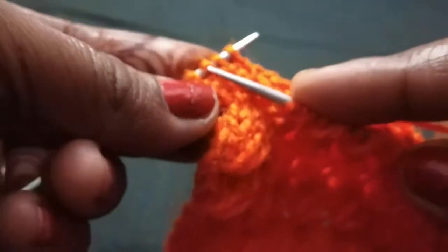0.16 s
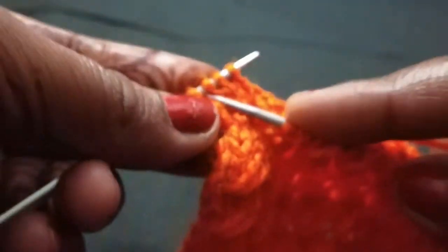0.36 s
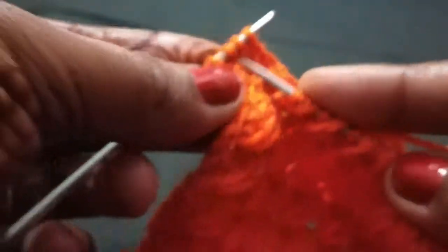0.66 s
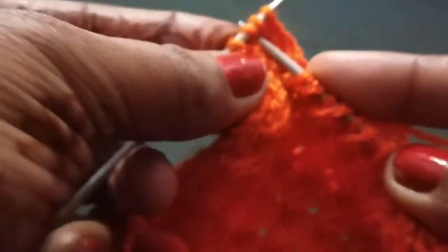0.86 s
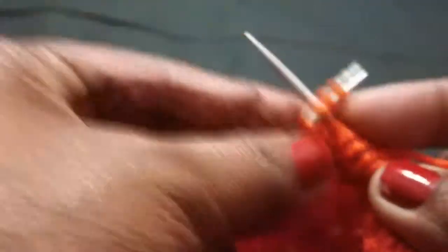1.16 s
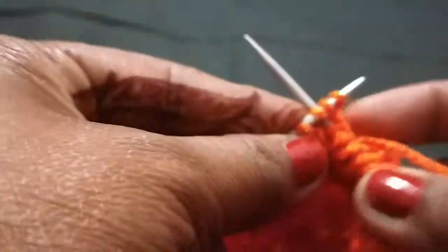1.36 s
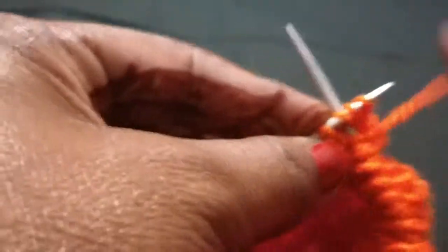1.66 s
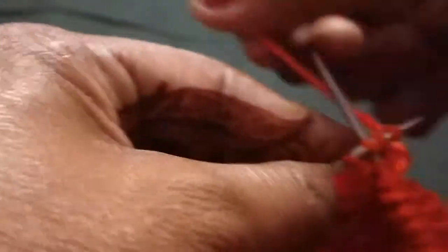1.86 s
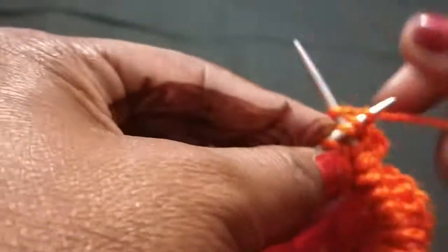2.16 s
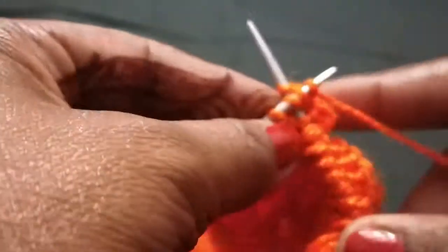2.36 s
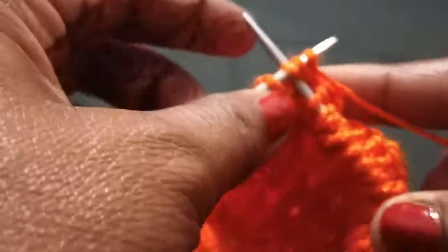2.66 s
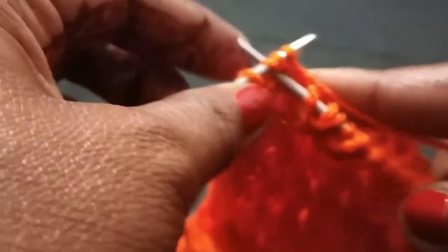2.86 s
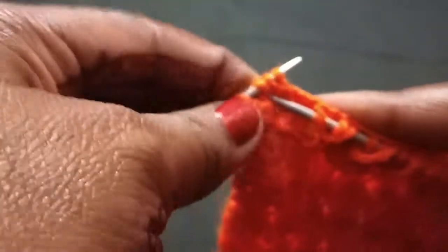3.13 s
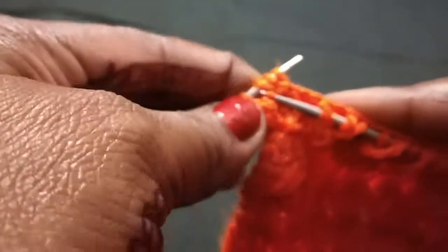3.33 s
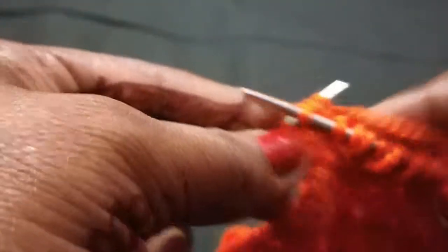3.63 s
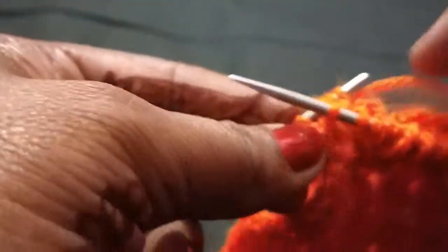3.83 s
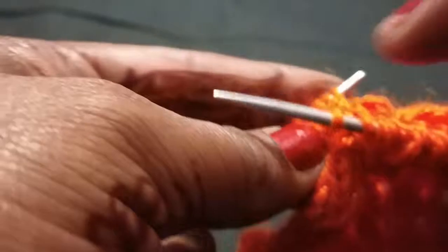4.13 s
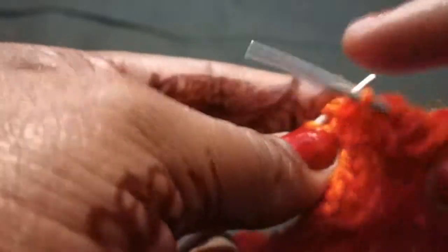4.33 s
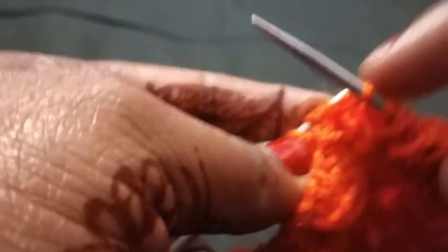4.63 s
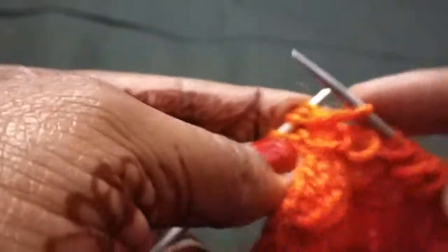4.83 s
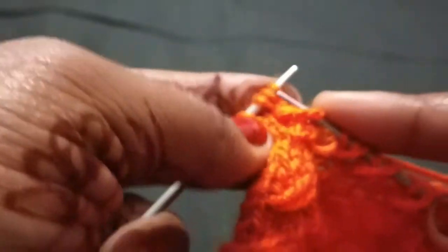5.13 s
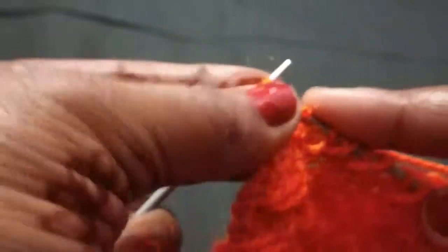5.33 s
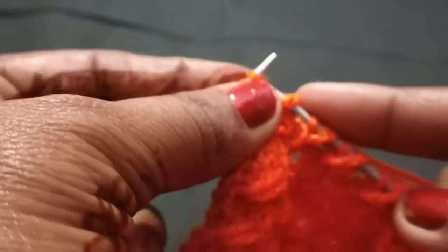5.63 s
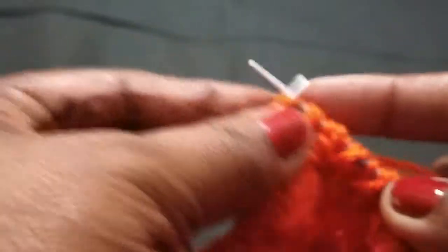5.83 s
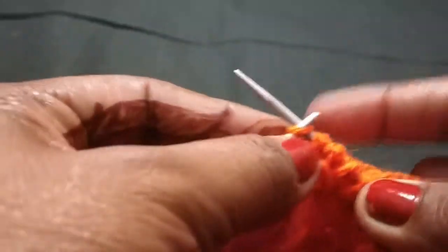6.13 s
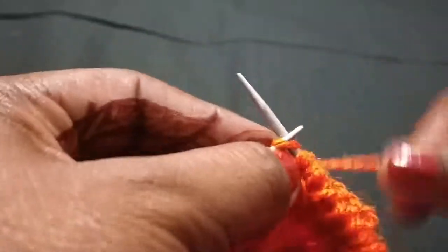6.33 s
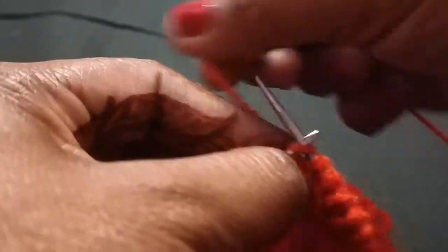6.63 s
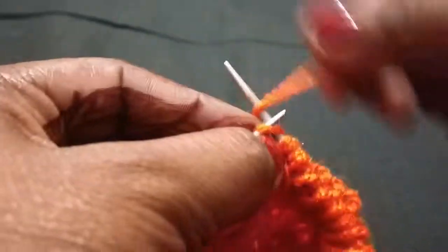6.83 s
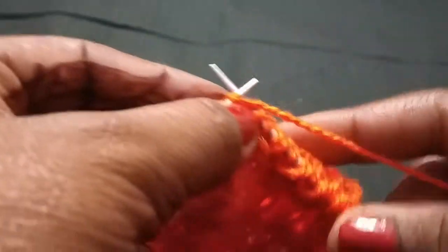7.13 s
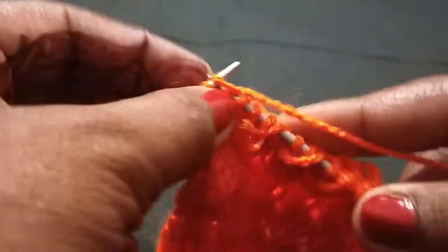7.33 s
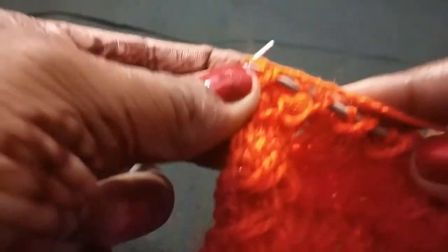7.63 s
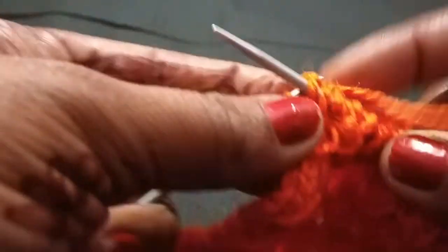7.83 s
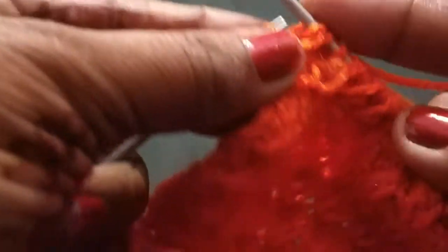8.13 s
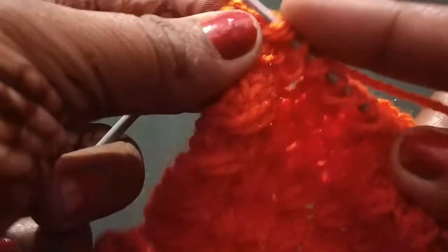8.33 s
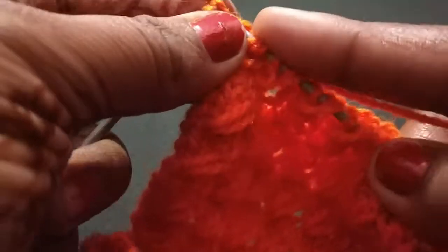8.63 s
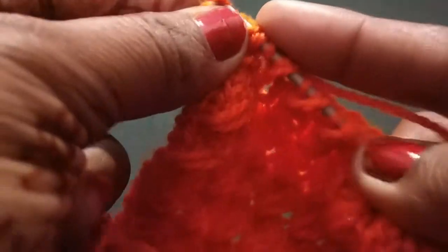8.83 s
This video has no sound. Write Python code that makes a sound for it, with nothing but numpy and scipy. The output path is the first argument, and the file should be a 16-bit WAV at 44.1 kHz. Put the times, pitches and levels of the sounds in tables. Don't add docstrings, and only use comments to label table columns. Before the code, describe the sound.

A small stereo microphone sits beside hands working wool on metal needles in a quiet room. Fibres scrape and swish, stitches slip off with small crisp snaps, and a needle end raps the plastic-like case in quick double or triple taps, mainly at right. Soft low bumps follow hand movements. Activity is hardest early, sparse midway, bumpy again after six seconds, then light and rustly, with thin hiss throughout.

```python
import sys
import numpy as np
from scipy import signal
from scipy.fft import rfft, irfft, next_fast_len
from scipy.io import wavfile
from scipy.ndimage import uniform_filter1d

SR = 44100
rng = np.random.default_rng(int(sys.argv[2]) if len(sys.argv) > 2 else 0)


def wav_record(signal):
    frames = np.transpose(np.atleast_2d(signal))
    bounded = np.clip(frames, -1, 1)
    quanta = np.round(bounded * 32767).astype(np.int16)
    wavfile.write(sys.argv[1], SR, quanta)


def magnitude_from_level(level_db):
    exponent = np.asarray(level_db, float) / 20
    return 10 ** exponent


N = 396018


def unit_rms(x):
    return x / np.sqrt(np.mean(x ** 2) + 1e-20)


def read_curve(points, hz):
    point_hz, value = np.transpose(points)
    return np.interp(np.log(hz + 1), np.log(point_hz + 1), value)


def resonances_db(modes, hz):
    power = sum(magnitude_from_level(2 * db) / (1 + ((hz - centre_hz) / width_hz) ** 4) for centre_hz, width_hz, db in modes)
    return 10 * np.log10(power)


def coloured(x, db_of_hz):
    size = next_fast_len(N)
    gain = magnitude_from_level(db_of_hz(np.fft.rfftfreq(size, 1 / SR)))
    return unit_rms(irfft(rfft(x, size) * gain, size)[:, :N])


def sides(left_right_db):
    return magnitude_from_level(np.array([left_right_db / 2, -left_right_db / 2]))


def ring(modes, t):
    return sum(magnitude_from_level(db - 60 * t / t60_s) * np.cos(2 * np.pi * hz * t) for hz, db, t60_s in modes)


def place(events, source, **settings):
    track = np.zeros((2, N))
    for start_s, *arguments in events:
        sound = source(*arguments, **settings)
        part = track[:, round(start_s * SR):][:, :sound.shape[1]]
        part += sound[:, :part.shape[1]]
    return track


def hiss():
    # hz, level_db
    spectrum = [(30, -60), (69, -30), (199, -1), (337, -3.5), (491, -9), (1340, -12.5), (4030, -16),
                (16000, -16.5)]
    # hz, left_right_likeness (0..1)
    likeness = [(60, 0.2), (290, 0.27), (640, 0.09), (1400, .01), (15000, 0.0083)]
    size = next_fast_len(N)
    hz = np.fft.rfftfreq(size, 1 / SR)
    a, b = rfft(rng.standard_normal((2, N + 1)), size)
    same = np.clip(read_curve(likeness, hz), 0, 1)
    pair = np.array([a, same * a + np.sqrt(1 - same ** 2) * b])
    noise = irfft(pair * magnitude_from_level(read_curve(spectrum, hz)), size)[:, :N]
    return magnitude_from_level(-57) * sides(-1.4)[:, None] * unit_rms(noise)


def strokes(table):
    swell_ratio = 1.13
    t = np.arange(0, N + 64, 64) / SR
    middle_s, half_s, db, extra_db = np.transpose(table)[:, :, None]
    u = (t - middle_s) / half_s * np.where(t < middle_s, 1 / swell_ratio, swell_ratio)
    return t, magnitude_from_level(2 * db) * np.exp(-2 * u ** 2), extra_db


def effort():
    # middle_s, half_length_s, rustle_db, left_right_db
    pulls = [(1.136, 0.061, -43.5, -2.5), (1.452, 0.087, -53, 0), (1.676, .049, -53, 4),
             (2.063, .045, -53, 0.5), (2.157, 0.04, -57.5, 3), (2.344, 0.02, -48.5, 5),
             (2.923, .043, -45, 0.5), (3.326, 0.033, -54.5, -1), (3.553, 0.053, -48.5, -1),
             (3.666, 0.087, -48, -2.5), (3.892, 0.086, -55, -1), (4.05, 0.046, -59, 5),
             (4.519, .035, -54, -5), (4.744, 0.086, -55.5, 2), (4.911, 0.06, -50.5, -5),
             (5.852, 0.063, -47, -2.5), (6.104, 0.11, -55.5, -2), (6.233, 0.049, -52, -2),
             (6.895, .025, -55, 1), (7.107, 0.041, -52, 0.5), (7.352, .034, -51.5, -1),
             (7.61, 0.091, -58.5, -5), (7.772, .074, -48.5, -3), (8.287, 0.045, -51, -6),
             (8.97, 0.062, -43.5, -1.5)]
    # middle_s, half_length_s, rustle_db, left_right_db
    slides = [(0.707, 0.36, -56, 4), (1.58, 0.28, -56.5, 2), (2.407, .229, -55.5, 0),
              (2.794, .11, -57.5, 0), (4.394, 0.11, -56, 3), (5.1, 0.12, -61.5, -1), (5.609, 0.18, -59, 2),
              (6.382, .107, -51, 2.5), (6.69, 0.092, -65.5, 17), (7.2, 0.29, -60, 0),
              (8.162, 0.47, -57, -0.5), (8.797, 0.12, -56, 3.5)]
    # middle_s, half_length_s, low_db, rub_above_low_db
    grips = [(.62, 0.26, -62.5, 5.5), (1.06, 0.073, -60.5, 2), (1.207, 0.013, -48, -7),
             (1.25, 0.052, -59, -15), (1.49, 0.087, -54, -0.5), (1.67, 0.097, -50, -1.5),
             (1.8, 0.16, -54.5, -4), (2.04, 0.078, -53, 0), (2.23, 0.07, -53.5, -15),
             (2.35, 0.11, -53.5, 1.5), (2.54, 0.058, -48, -9), (2.73, 0.1, -51, -3.5),
             (3.88, 0.051, -59.5, -3), (4.52, 0.063, -56.5, -0.5), (4.72, 0.12, -54.5, -11),
             (4.9, 0.044, -54.5, -4.5), (5.08, .13, -61.5, -4), (5.45, 0.065, -58.5, -15),
             (5.8, 0.11, -57.5, -8), (6.125, 0.053, -45.5, -8), (6.235, .05, -48.5, -4),
             (6.33, 0.11, -53, -2.5), (6.6, 0.083, -51.5, -3), (6.76, .1, -53.5, -4),
             (7.1, 0.042, -51, -4.5), (7.64, 0.071, -57.5, -4), (8.12, 0.13, -70, 7.5),
             (8.78, 0.051, -60.5, -1), (8.95, 0.061, -53, -3.5)]
    idle_rustle_db, idle_rub_db, idle_low_db = -67, -74.5, -69
    rub_below_rustle_db = -11

    t, pull, pan_db = strokes(pulls + slides)
    _, grip, rub_db = strokes(grips)
    rustle = pull.sum(0) + magnitude_from_level(2 * idle_rustle_db)
    rub = magnitude_from_level(2 * rub_below_rustle_db) * pull.sum(0)
    rub = rub + (grip * magnitude_from_level(2 * rub_db)).sum(0) + magnitude_from_level(2 * idle_rub_db)
    low = grip.sum(0) + magnitude_from_level(2 * idle_low_db)
    side_db = (pull * pan_db).sum(0) / rustle
    curves = np.sqrt(rustle), np.sqrt(rub), np.sqrt(low), side_db
    return [np.interp(np.arange(N) / SR, t, curve) for curve in curves]


def fibres(per_s, spread_db, share, lag_samples):
    snaps = rng.standard_normal((3, N)) * (rng.random(N) < per_s / SR)
    snaps *= magnitude_from_level(spread_db * np.minimum(rng.exponential(1, N), 4))
    common = np.array([np.roll(snaps[2], lag_samples), snaps[2]])
    return np.sqrt(share) * common + np.sqrt(1 - share) * snaps[:2]


def patchy(x, patchy_db, bins, frames):
    z = signal.stft(x, nperseg=256)[2]
    field = uniform_filter1d(rng.standard_normal(z.shape[1:]), bins, axis=0)
    field = unit_rms(uniform_filter1d(field, frames, axis=1))
    return unit_rms(signal.istft(z * magnitude_from_level(patchy_db * field), nperseg=256)[1][:, :N])


def wool():
    # hz, level_db
    rustle_spectrum = [(1500, -28), (3000, -10.5), (5000, -9.5), (9000, -2), (11500, -2.5), (14000, -2),
                       (16000, -5.5)]
    # hz, level_db
    rub_spectrum = [(300, -2), (600, 2), (1200, -1.5), (2500, -2.5), (5000, -8.5), (9000, -14)]
    # centre_hz, width_hz, level_db
    stand = [(231, 40, -0.5), (294, 80, -6)]
    rustle_gain, rub_gain, low_gain, side_db = effort()
    rustle = coloured(fibres(12000, 0.83, 0.033, 12), lambda hz: read_curve(rustle_spectrum, hz))
    rustle = patchy(rustle, 1.26, bins=24, frames=4)
    rub = coloured(fibres(3000, 1.5, 0.17, 8), lambda hz: read_curve(rub_spectrum, hz))
    rub = patchy(rub, 3.2, bins=4, frames=8)
    low = coloured(fibres(400, 1.84, 0.94, 3), lambda hz: resonances_db(stand, hz))
    return sides(side_db) * (rustle_gain * rustle + rub_gain * rub) + low_gain * low


def squeak():
    # time_s, level_db
    swell = [
        (.25, -95),
        (.33, -86),
        (.55, -72.5),
        (.66, -91),
    ]
    # centre_hz, width_hz
    partials = [(750, 55), (1550, 83)]
    time_s, db = np.transpose(swell)
    level_db = np.interp(np.arange(N) / SR, time_s, db, -120, -120)
    modes = [(hz, width_hz, 0) for hz, width_hz in partials]
    return magnitude_from_level(level_db) * coloured(rng.standard_normal((2, N)), lambda hz: resonances_db(modes, hz))


def push(t, start_ms, contact_ms):
    u = np.maximum(t * 1000 - start_ms, 0) / (0.21 * contact_ms)
    force = u ** 2 * np.exp(-u)
    return force / np.sum(force)


def knock(db, contact_ms, rebound, ring_hz):
    # multiple_of_ring_hz, level_db, t60_s
    case_right = [(1, 0.5, 0.0059), (2.6, -20, 0.0024), (5, -8, 0.0013), (7.5, -16, 0.0013)]
    # hz, level_db, t60_s
    case_left = [(450, -24, 0.017), (255, -41.5, 0.037), (900, -52, .006)]
    # hz, level_db, t60_s
    case_sway = [(230, -13.5, 0.036), (360, -22, 0.014)]
    travel_s, rebound_ms = 0.0012, 2.246
    t = np.arange(2500) / SR

    def near(hz):
        return ring([(multiple * hz, *rest) for multiple, *rest in case_right], t)

    sway = -ring(case_sway, t) * np.minimum(t / 0.000057, 1)
    far = -ring(case_left, t) * np.minimum(t / 0.00024, 1)
    far = np.pad(far, (round(travel_s * SR), 0))[:len(t)]
    blow = push(t[:400], 0, contact_ms)[None]
    bounce = push(t[:400], rebound_ms, 1.86 * contact_ms)[None]
    first = signal.fftconvolve([far, near(ring_hz) + sway], blow, axes=1)
    second = signal.fftconvolve([far, near(0.79 * ring_hz)], bounce, axes=1)
    return magnitude_from_level(db + 9.5) * (first + rebound * second)


def knocks():
    # start_s, peak_db, contact_ms, rebound_share, ring_hz
    hits = [(1.18, -12.5, 0.11, 0.35, 960), (1.1894, -17.5, 0.33, .2, 820), (1.195, -23, 0.73, 0.44, 660),
            (1.2598, -21.5, 0.23, 0.35, 830), (1.2708, -28.5, 0.43, 0.74, 490),
            (1.2774, -33, 0.69, 0.94, 750), (1.4749, -13, 0.14, 0.52, 905),
            (1.4837, -17.5, 0.28, 0.17, 806), (2.1977, -19.5, 0.25, 0.43, 760),
            (2.2052, -26.5, 0.68, .42, 810), (2.5154, -16.5, 0.19, 0.43, 900),
            (2.5221, -22.5, .48, 0.52, 725), (6.0947, -29.5, 0.27, 0.31, 730),
            (6.3444, -23.5, 0.23, 0.81, 520), (6.3526, -29, 0.41, 0.4, 470), (6.6093, -26, 0.21, 0.87, 510),
            (6.6172, -33, 0.54, .5, 450), (6.9873, -21, 0.27, 0.88, 750), (6.9953, -28, 0.45, 0.71, 610)]
    return place(hits, knock)


def burst(db, length_ms, centre_hz, left_right_db, width_hz):
    size = 2048
    noise = rng.standard_normal((2, size)) * magnitude_from_level(0.65 * rng.exponential(1, size))
    hz = np.fft.rfftfreq(size, 1 / SR)
    band = 1 / np.sqrt(1 + ((hz - centre_hz) / (0.5 * width_hz)) ** 2)
    noise = unit_rms(irfft(rfft(noise) * band))
    u = np.arange(size) / SR * 1000 / length_ms
    envelope = np.minimum(u / 0.043, 1) / (1 + u ** 6)
    return magnitude_from_level(db - 6) * sides(left_right_db)[:, None] * noise * envelope


def slips():
    # start_s, peak_db, length_ms, centre_hz, left_right_db
    stitches = [(1.4283, -38, 7.5, 10500, 0), (1.599, -48, 9, 9520, 1), (2.4005, -44.5, 13, 3460, 6),
                (2.7426, -41, 16, 2030, 9), (2.7483, -37, 7.3, 3840, 4.5), (3.3214, -51.5, 6.2, 8530, -1),
                (3.8753, -45.5, 14, 11600, -11), (4.5194, -49, 6.6, 12000, 4), (4.865, -48, 5.3, 9010, -8),
                (6.094, -40.5, 5.7, 9670, -2), (6.8894, -51, 8.3, 11000, -1), (7.092, -44.5, 9.7, 5700, -1),
                (7.3497, -47, 8.1, 10200, -3), (7.6011, -45.5, 17, 10200, -1.5)]
    return place(stitches, burst, width_hz=8000)


def thump(db, hz, t60_s, left_right_db):
    snap_db_per_s = -130
    t = np.arange(4000) / SR
    modes = [(hz, 0, t60_s), (2.74 * hz, snap_db_per_s * t60_s, 0.35 * t60_s)]
    body = ring(modes, t) * np.minimum(t / 0.00083, 1)
    return magnitude_from_level(db) * sides(left_right_db)[:, None] * body


def thumps():
    # start_s, peak_db, hz, t60_s, left_right_db
    jolts = [(1.429, -31, 255, 0.07, 2.5), (1.663, -39, 330, .067, 4), (2.006, -42.5, 350, 0.065, 6),
             (2.39, -35.5, 223, .078, 1), (2.488, -26.5, 324, 0.033, 6), (2.678, -46, 266, 0.1, 9),
             (2.754, -31, 382, 0.031, 3), (3.876, -45, 290, .05, -2), (4.508, -41, 212, 0.039, -5),
             (4.668, -39.5, 224, 0.036, -6), (4.867, -37, 224, 0.046, -3), (6.078, -44, 242, .05, 0),
             (6.084, -35, 260, .05, -10), (6.094, -24, 235, 0.12, 2.5), (6.187, -37, 234, 0.064, -5),
             (6.208, -38, 231, .05, -6), (6.218, -34, 222, 0.14, -3), (6.231, -29, 346, 0.028, 6),
             (6.236, -33, 230, 0.029, -3), (6.618, -33, 256, 0.066, -2), (7.1, -37.5, 219, 0.14, 2),
             (7.613, -39.5, 221, .072, -3), (7.748, -47, 192, 0.094, -3), (8.277, -45.5, 214, 0.13, -3)]
    return place(jolts, thump)


def ticks():
    # start_s, peak_db, length_ms, centre_hz, left_right_db
    touches = [
        (2.4862, -27, 2.6, 6000, 3),
        (7.5657, -37, 2.6, 6500, -2),
    ]
    return place(touches, burst, width_hz=14000)


def drags():
    # start_s, peak_db, length_ms, centre_hz, left_right_db
    scrapes = [
        (2.535, -48.5, 36, 960, -17),
        (2.675, -54, 31, 1000, 2),
        (7.79, -54, 41, 2800, -3),
        (8.13, -55.5, 72, 2510, 0),
    ]
    return place(scrapes, burst, width_hz=760)


def ping():
    # hz, level_db, t60_s
    tip_modes = [(14600, -30, .003), (12800, -36, .002)]
    sound = np.ones((2, 1)) * ring(tip_modes, np.arange(300) / SR)
    return place([(8.9169,)], lambda: sound)


def scene():
    steady = hiss() + wool() + squeak()
    return steady + knocks() + slips() + thumps() + ticks() + drags() + ping()


def gate(x):
    # hz, gate_strength (exponent)
    strength = [(2200, 0), (3000, .5), (4200, 1.15), (7000, 1.35), (9000, 1.2), (14800, 1.3), (15300, .3)]
    turn = np.array([[1, 1], [1, -1]]) / np.sqrt(2)
    hz, _, z = signal.stft(turn @ x, SR, nperseg=2048, noverlap=1536)
    near = uniform_filter1d(uniform_filter1d(abs(z) ** 2, size=5, axis=1), size=5, axis=2)
    wide = uniform_filter1d(near, size=41, axis=1)
    quiet = wide < 30 * np.median(wide, axis=2, keepdims=True)
    ratio = np.minimum(abs(near) / (abs(wide) + 1e-20), 1.3)
    gain = ratio ** (read_curve(strength, hz)[:, None] * quiet)
    return turn @ signal.istft(z * gain, SR, nperseg=2048, noverlap=1536)[1][:, :N]


def band_limit(x):
    return signal.sosfilt(signal.butter(12, 16830, fs=SR, output="sos"), x)


def record(dry):
    bass_cut_hz, edge_hz = 190, 15730
    cut = signal.sosfilt(signal.butter(2, bass_cut_hz, "highpass", fs=SR, output="sos"), dry)
    lowpass = signal.firwin(1023, edge_hz, window=("kaiser", 9), fs=SR)
    mix = signal.oaconvolve(gate(cut), lowpass[None], "same")
    return band_limit(mix)


dry = scene()
out = record(dry)
wav_record(out)
```